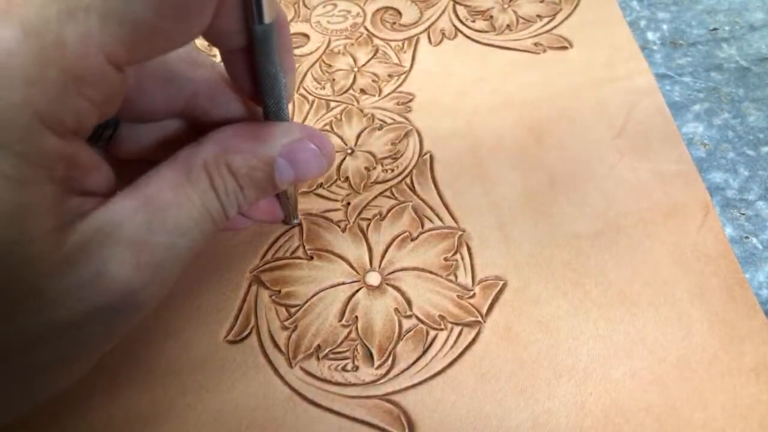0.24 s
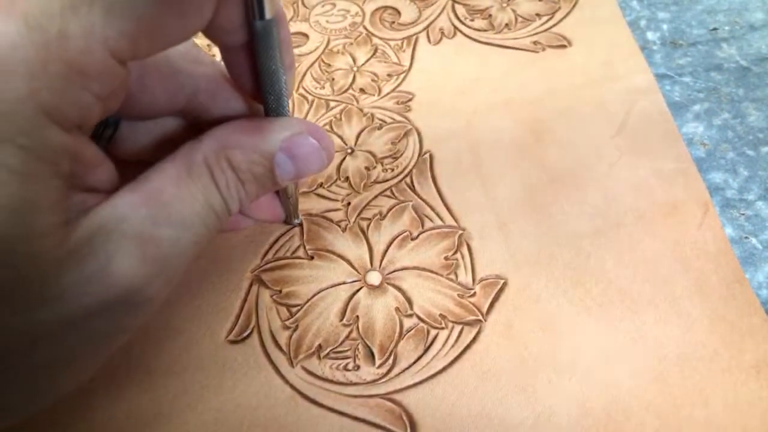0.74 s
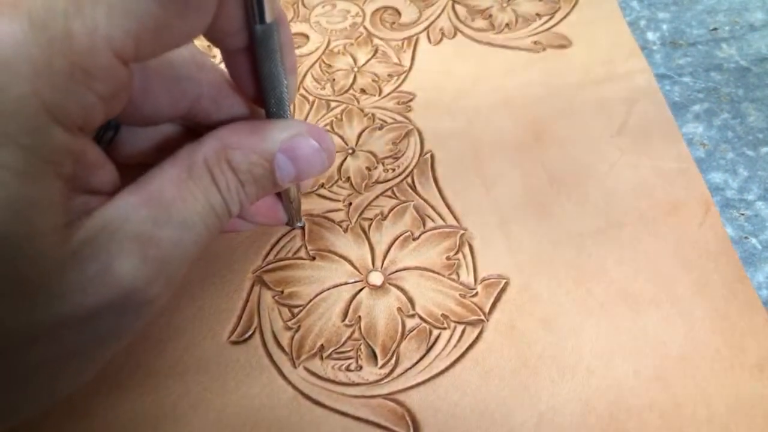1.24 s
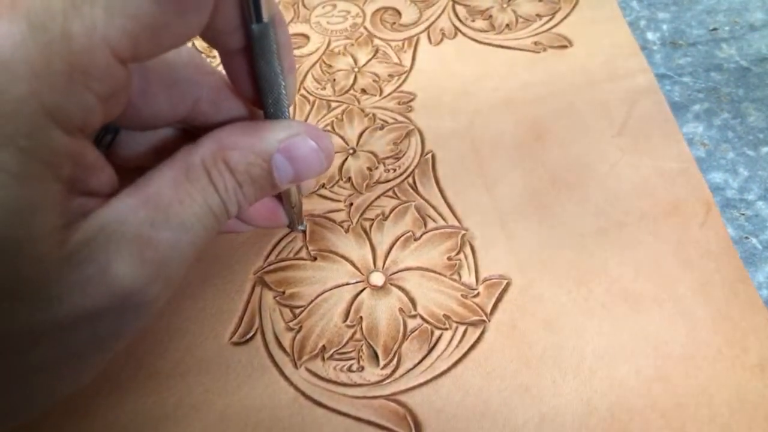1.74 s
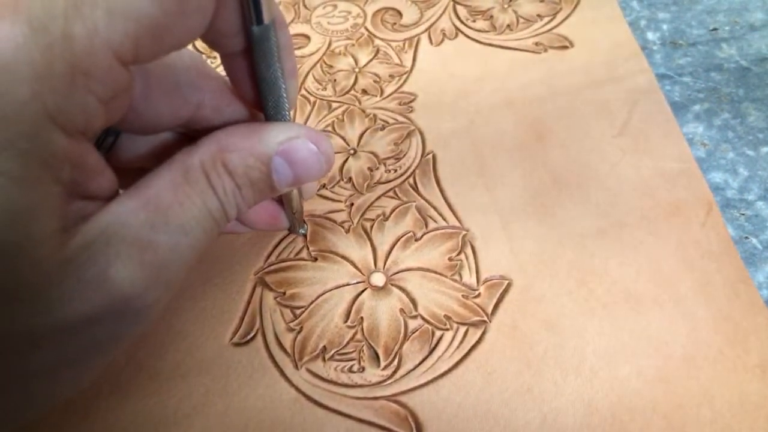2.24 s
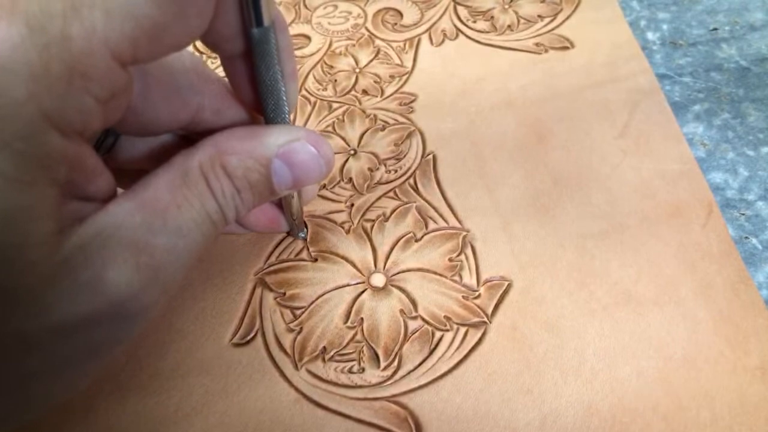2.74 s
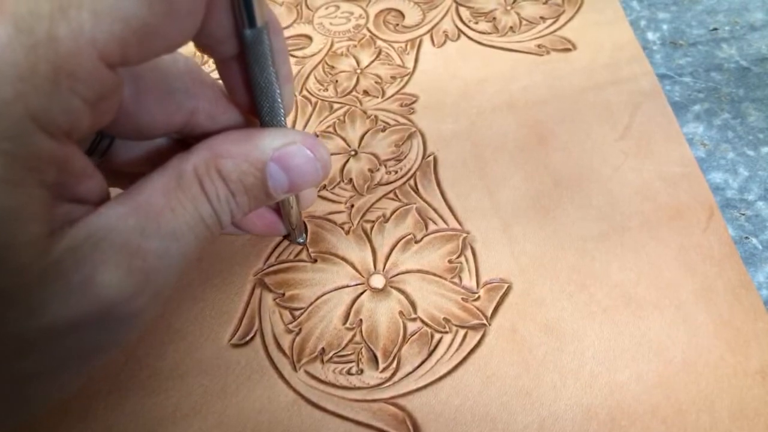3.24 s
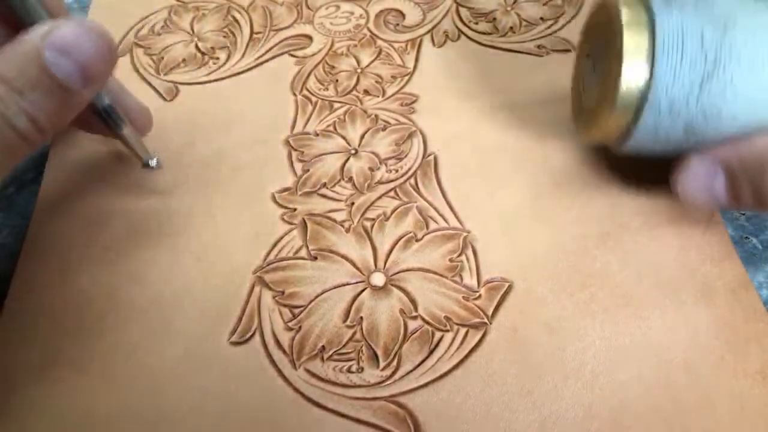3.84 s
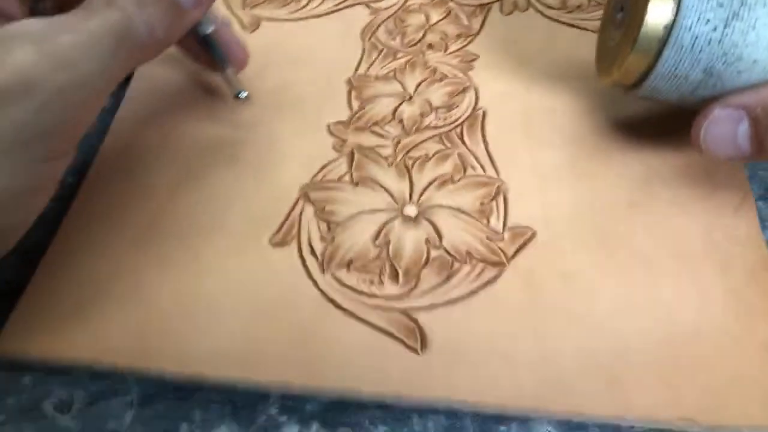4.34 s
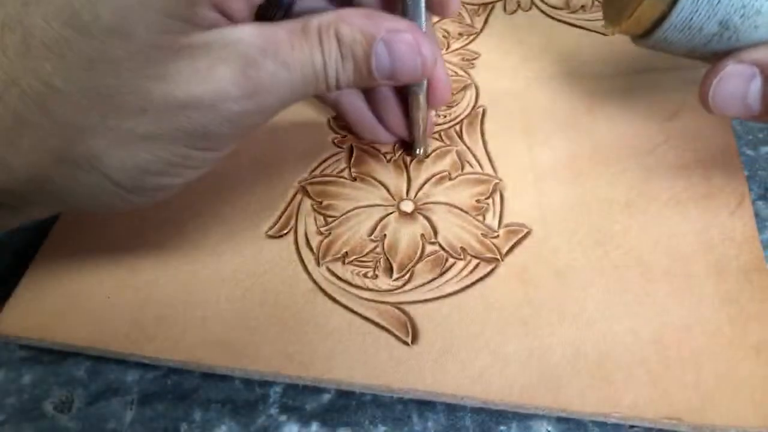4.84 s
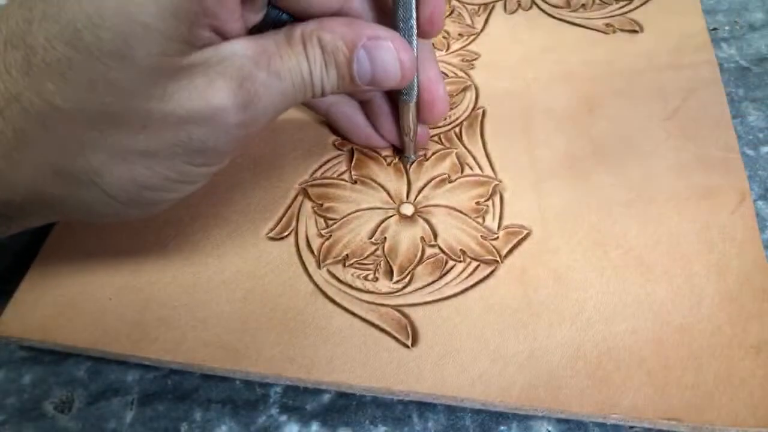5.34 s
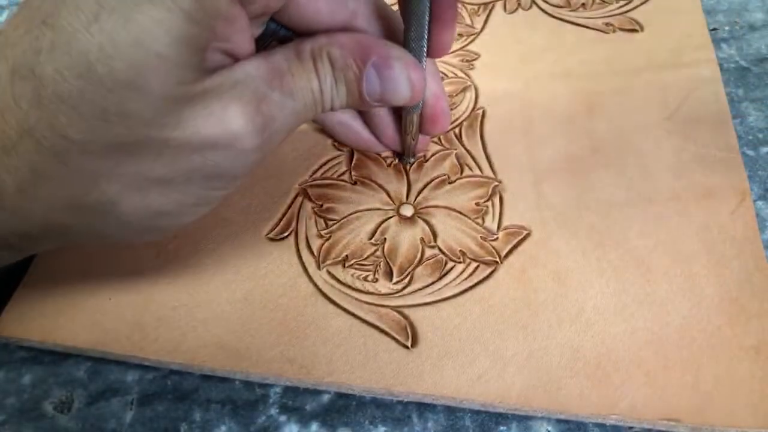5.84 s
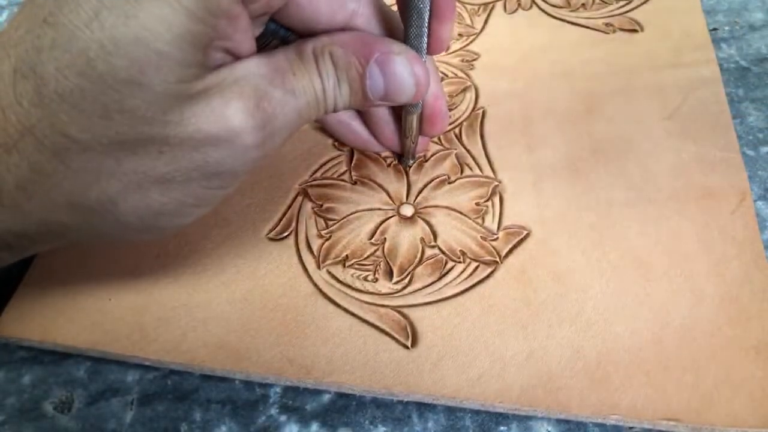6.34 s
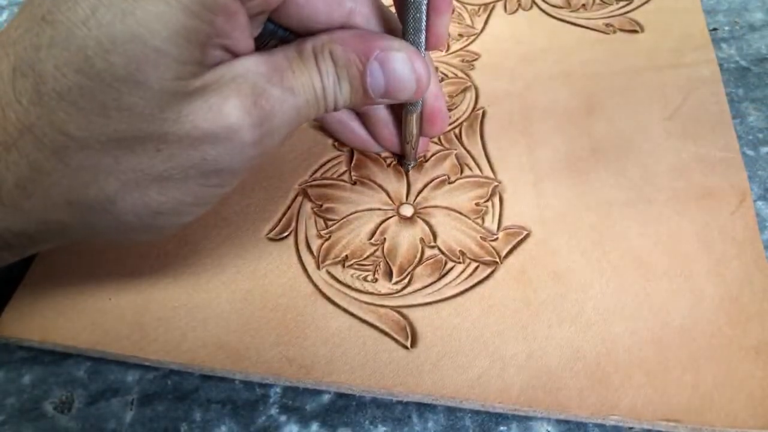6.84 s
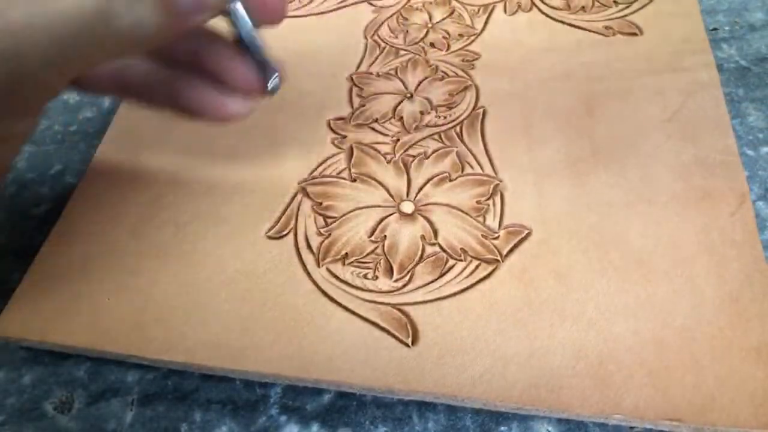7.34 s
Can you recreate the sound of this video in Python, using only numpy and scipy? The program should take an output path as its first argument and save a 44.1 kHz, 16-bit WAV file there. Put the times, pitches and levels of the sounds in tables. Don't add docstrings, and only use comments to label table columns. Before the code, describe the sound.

A mallet taps a steel stamp into leather on a stone slab in two bursts, with soft leather sliding and small ticks between them.

```python
import sys
import numpy as np
from scipy import signal
from scipy.fft import rfft, irfft, next_fast_len
from scipy.io import wavfile

SR = 44100
rng = np.random.default_rng(int(sys.argv[2]) if len(sys.argv) > 2 else 0)


def undo_db(level):
    steps = np.asarray(level, float) / 20
    return 10 ** steps


def wav_out(sig):
    wavfile.write(sys.argv[1], SR, np.round(np.clip(np.atleast_2d(sig).T, -1, 1) * 32767).astype(np.int16))


N = 334278
PAD = next_fast_len(N + SR)
HZ = np.maximum(np.arange(PAD // 2 + 1) * SR / PAD, 10)

# f/Hz, level/dB per Hz
AIR = [(40, -7.5), (86, -11), (118, -6.5), (175, -16), (228, -13), (322, -20), (453, -25.5), (748, -32.5),
       (2500, -42), (14000, -48), (16400, -55)]
AIR_DB = -62
# f/Hz, width/Hz, level/dB
HUM = (121, 7.4, -71.5)
# t/s, crack level/dB, weight level/dB, tip ring level/dB, shank ring f/Hz
BLOWS = [(0.2279, -49.5, -36.5, -30.5, 2200), (0.4788, -42, -31, -25.5, 2150),
         (0.736, -35, -27.5, -40, 2250), (1.0099, -41, -27.5, -37, 2060), (1.254, -37, -24.5, -37, 2275),
         (1.488, -36.5, -25.5, -37.5, 2480), (1.7147, -36.5, -25.5, -47, 2430),
         (1.9431, -39.5, -26, -31, 2570), (2.1639, -45.5, -27.5, -36.5, 2210), (2.383, -54, -34, -45, 2180),
         (2.5772, -58.5, -40.5, -52, 2190), (2.7722, -52.5, -42, -39, 2060),
         (2.9566, -57, -48.5, -40.5, 2130), (3.1273, -61.5, -59, -42, 2180), (3.2965, -62, -58, -44, 2520),
         (5.7841, -53.5, -35, -41.5, 2230), (6.0188, -35, -27.5, -25, 2620), (6.277, -40, -31, -50, 2640),
         (6.5086, -46, -36, -35.5, 2310), (6.7032, -49, -41, -33, 2150), (6.8925, -53, -46.5, -42, 1834)]
FIRM_CRACK_DB = -37
# f/Hz, width/Hz, level/dB (the narrow 643 Hz ring is a mode of slab and
CLICK_RINGS = [
    [(2573, 690, -6.5), (2980, 570, -11.5)],
    [(1083, 533, 7), (643, 60, -16.5)],
]
NEW_GRIP_S = (2.3, 4.5, 5.9)
# level/dB in a firm blow, loss/dB per dB of crack
GRIP_LEVELS = [
    [(-16.5, 0.54), (-23.5, 0.32), (-23.5, 0.72), (-33, 1.6)],
    [(-20.5, 0.45), (-21.5, 0.42), (-13.5, 0.83), (-35.5, 1.3)],
    [(-22, 0.2), (-34, 0.17), (-25, 1.3), (-35, 1.5)],
    [(-24.5, 0.75), (-38.5, 0.12), (-23, 0.45), (-37, 0.1)],
]
# head ring f/Hz, tip ring f/Hz, shoulder ring f/Hz, depth of the dead band/0-1
GRIP_PITCHES = [(1863, 3850, 4750, 0.6), (1794, 3900, 4400, 0.93), (1541, 4110, 4800, 0.2),
                (1786, 3930, 4350, 0.1)]
PITCH_SCATTER = 0.015
STEEL_LAG_S = 0.0008
DEAD_HZ, DEAD_WIDTH_HZ = 1526, 170
# f/Hz, level/dB per Hz
SPRAY = [(500, -15.5), (1500, -5), (4500, 7), (6200, -6), (8800, -9), (12000, -19.5), (15000, -20.5),
         (16300, -54.5)]
# f/Hz, level/dB per Hz
THUMP = [(40, -6), (130, 0), (220, -0.5), (310, 4), (490, 2), (545, -8.5), (700, -34), (1000, -52)]
# f/Hz, level/dB, t60/s
BENCH = [(75, -5, 0.34), (128, -8.5, 0.15), (164.4, -13, 0.2), (215.8, -9, .33), (266, -9, 0.17),
         (298, -7.5, 0.61), (341.5, -5.5, 0.22), (353.5, -4.5, 0.17), (382, -7.5, 0.26), (430, -11, .25),
         (623, 3.5, 0.4)]
# f/Hz, t60/s, level/dB
SHOP = [(83.16, 0.2, -16), (196, 0.56, -15), (320, 0.39, -10), (480, 0.47, -18.5), (695, 0.27, -11),
        (1080, 0.28, -17.5), (2903, .3, -16), (4965, 0.23, -17), (7800, .25, -22), (14000, 0.17, -14.5)]
# delay/s, level/dB
ECHOES = [(.0102, -15), (.0131, -13), (.0186, -12), (.029, -22)]
# t/s, peak level/dB, low ring f/Hz, snap level/dB (unused: snaps follow
TICKS = [(3.442, -43.5, 380, -78.5), (3.75, -52, 805, -51.5), (3.963, -54, 1690, -58),
         (4.388, -44.5, 1200, -44), (4.957, -64, 703, -60), (7.055, -58, 1230, -59)]
# start t/s, rise/s, hold/s, fall/s, level/dB
SLIDES = [
    (3.55, 0.2, .01, 0.17, -68.5),
    (4.04, 0.065, 0.23, .06, -73),
    (4.448, .22, 0.039, 0.23, -77.5),
    (7.12, 0.16, 0.063, 0.27, -71),
]
SLIDE_EASE = 1.33
# f/Hz, level/dB per Hz
SLIDE_COLOUR = [(290, -36), (500, -4), (988, -3), (1720, -7.5), (1900, -6.5), (3980, -9), (4660, -8.5),
                (11800, -21), (16000, -47)]
# f/Hz, width/Hz, level/dB, strongest at t/s
SLIDE_RINGS = [(870, 48, -10, 3.64), (1740, 69, -8, 3.78), (1744, 33, -5.5, 4.24), (3520, 100, -13, 4.2),
               (1206, 22, -4, 4.7), (3600, 250, -14.5, 7.32)]
MIC_CUT_HZ, MIC_TURNS = 68, 2.6


def rms_one(x):
    return x / np.sqrt(np.mean(x ** 2) + 1e-20)


def at_hz(points, hz, axis=1):
    points = np.array(points)
    return np.interp(np.log(hz), np.log(points[:, 0]), points[:, axis])


def shaped(x, response):
    return irfft(rfft(x, PAD) * response, PAD)[:N]


def resonate(x, hz, width_hz):
    r, w = np.exp(-np.pi * width_hz / SR), 2 * np.pi * hz / SR
    return signal.lfilter([0, np.sin(w)], [1, -2 * r * np.cos(w), r * r], x + 1e-18)


def clicks(times, sizes):
    out = np.zeros(N)
    out[(np.asarray(times) * SR).astype(int)] = sizes
    return out


def drift(rate):
    r = np.exp(-2 * np.pi * rate / SR)
    slow = signal.lfilter([1], [1, -2 * r, r * r], rng.standard_normal(N + SR))
    return rms_one(slow[SR:])


def swell(hz, width_hz, lag_s):
    t = np.maximum(np.arange(2048) / SR - lag_s, 0)
    decay = np.pi * width_hz * t
    return (decay / 2) ** 2 * np.exp(2 - decay) * np.sin(2 * np.pi * hz * t)


def air():
    hz, width_hz, hum_db = HUM
    floor = rms_one(shaped(rng.standard_normal(N), undo_db(at_hz(AIR, HZ))))
    hum = resonate(resonate(rng.standard_normal(N), hz, width_hz), hz, width_hz)
    return floor * undo_db(AIR_DB + 0.7 * drift(3)) + undo_db(hum_db) * rms_one(hum)


def grip(s):
    return int(np.searchsorted(NEW_GRIP_S, s))


def ring_levels():
    return np.array([[db + follows * (crack_db - FIRM_CRACK_DB) for db, follows in GRIP_LEVELS[grip(s)]]
                     for s, crack_db, *_ in BLOWS])


def click(spread_db, stagger_s, spray_s, blur, sideways_db):
    close, around = np.zeros(N), np.zeros(N)
    t = np.arange(2048) / SR
    chance = rng.standard_normal((len(BLOWS), 3, 9))
    noise = rng.standard_normal((len(BLOWS), 2048))
    colour = undo_db(at_hz(SPRAY, np.maximum(np.arange(1025) * SR / 2048, 10)))
    puff = t / spray_s * np.exp(1 - t / spray_s)
    dead_band = signal.iirpeak(DEAD_HZ, DEAD_HZ / DEAD_WIDTH_HZ, SR)
    for k, (blow, levels) in enumerate(zip(BLOWS, ring_levels())):
        s, crack_db, _, tip_db, shank_hz = blow
        *pitches, dead_depth = GRIP_PITCHES[grip(s)]
        head_hz, tip_hz, shoulder_hz = np.array(pitches) * (1 + PITCH_SCATTER * chance[k, :, -1])
        rings = [(hz, width, db + levels[family]) for family in (0, 1)
                 for hz, width, db in CLICK_RINGS[family]]
        rings += [(head_hz, 400, levels[0] - 2), (shank_hz, 400, levels[2] + 1.5),
                  (tip_hz, 400, tip_db + 3), (shoulder_hz, 400, levels[3])]
        spray = undo_db(crack_db + 8) * rms_one(irfft(rfft(noise[k]) * colour)) * puff
        start = int((s - 0.0016) * SR)
        span = slice(start, start + 2048)
        for (hz, width, db), a, b, c in zip(rings, *chance[k]):
            size = undo_db(db + spread_db * a) * np.sign(b)
            lag_s = stagger_s * abs(c) + STEEL_LAG_S * (hz > DEAD_HZ)
            close[span] += size * swell(hz, width, lag_s)
            around[span] += size * swell(hz, width * blur, lag_s)
        close[span] += spray
        close[span] -= dead_depth * signal.lfilter(*dead_band, close[span])
        around[span] += spray * undo_db(sideways_db)
    return close, around


def thump(lag_s, thump_db, bench_db, deep_share):
    rows = np.array(BLOWS)
    times = rows[:, 0] + lag_s
    level_db = rows[:, 2] + 28
    edge_db = level_db + 0.45 * (ring_levels()[:, 1] + 24.5)
    deep = 1 / (1 + (HZ / 190) ** 4)
    edge = 1 / (1 + (420 / HZ) ** 8)
    push = shaped(clicks(times, -undo_db(level_db)), (1 - deep) * (1 - edge))
    push += shaped(clicks(times, -undo_db(edge_db)), edge)
    push += shaped(clicks(times, -undo_db(deep_share * level_db)), deep)
    push = undo_db(thump_db) * shaped(push, undo_db(at_hz(THUMP, HZ)))
    rings = sum(undo_db(db) * resonate(push, hz, np.log(1000) / np.pi / min(t60, 0.36))
                for hz, db, t60 in BENCH)
    return push + undo_db(bench_db) * rings


def workshop(x, build_s, dull_hz):
    t, tail = np.arange(SR) / SR, 0
    build = np.clip(t / build_s, 0, 1) ** 2
    edges = 45 * 2 ** np.arange(0, 9, 0.5)
    white = rng.standard_normal((2, SR))
    for k, (low, high) in enumerate(zip(edges, edges[1:])):
        band_pass = signal.butter(2, [low, high], "band", fs=SR, output="sos")
        band = signal.sosfilt(band_pass, white[k % 2])
        hz = np.sqrt(low * high)
        level_db = at_hz(SHOP, hz, axis=2) - 23 - 60 * t / at_hz(SHOP, hz)
        tail = tail + band * undo_db(level_db) * build
    echoes = sum(undo_db(db) * np.exp(-2j * np.pi * HZ * s) for s, db in ECHOES)
    echoes = echoes / np.sqrt(1 + (HZ / dull_hz) ** 2)
    return shaped(x, rfft(tail, PAD) + echoes)


def ticks():
    s, peak_db = np.transpose(TICKS)[:2]
    ring = sum(shaped(clicks([t], undo_db(db - 11.5)), rfft(swell(hz, 300, 0), PAD)) for t, db, hz, _ in TICKS)
    hits = clicks(s, undo_db(peak_db))
    snap = undo_db(-0.5) * resonate(hits, 630, 440)
    snap += undo_db(-1.5) * resonate(hits, 2500, 2300)
    snap += undo_db(1.5) * resonate(hits, 8000, 3000)
    scuff = rng.standard_normal(300) * np.hanning(300) / 10
    return ring + np.convolve(snap, scuff)[100:N + 100]


def slide(grains_per_s, uneven_db):
    t = np.arange(N) / SR
    level = sum(undo_db(db) * np.interp(t, s + np.cumsum([0, rise, hold, fall]), [0, 1, 1, 0]) ** SLIDE_EASE
                for s, rise, hold, fall, db in SLIDES)
    grains = (rng.random(N) < grains_per_s / SR) * undo_db(uneven_db * rng.exponential(1, N))
    grains = grains * rng.choice([-1, 1], N)
    hiss = rms_one(shaped(grains, undo_db(at_hz(SLIDE_COLOUR, HZ)) * (HZ > 400)))
    rings = sum(undo_db(db - 310 * (t - s) ** 2) * rms_one(resonate(grains, hz, width_hz))
                for hz, width_hz, db, s in SLIDE_RINGS)
    return level * (hiss + rings) * undo_db(1.5 * drift(42) + 1)


def scene():
    close, around = click(spread_db=-0.5, stagger_s=0.0005, spray_s=0.0015, blur=2.6, sideways_db=1.5)
    low = thump(lag_s=0.0052, thump_db=12, bench_db=-53, deep_share=0.7) + ticks()
    room = workshop(around + low, build_s=0.0056, dull_hz=950)
    return (close + low + room + slide(grains_per_s=8000, uneven_db=1.84) + air())[None]


def top_cut(x):
    return signal.sosfilt(signal.butter(12, 16500, fs=SR, output="sos"), x)


def record(dry):
    late = np.exp(2j * np.pi * MIC_TURNS / (1 + (HZ / MIC_CUT_HZ) ** 3))
    x = shaped(dry[0], late / np.sqrt(1 + (MIC_CUT_HZ / HZ) ** 12))
    ahead = np.arange(1024) / SR
    smear = rng.standard_normal(1024) * undo_db(-38 - 1100 * ahead) * np.cos(ahead * SR / 2048 * np.pi)
    upper = signal.sosfilt(signal.butter(2, 600, "high", fs=SR, output="sos"), x)
    early = shaped(upper[::-1], rfft(smear, PAD))[::-1]
    mix = 0.57 * np.tanh((x + early) / 0.55)
    return top_cut(mix[None])


dry = scene()
out = record(dry)
wav_out(out)
```